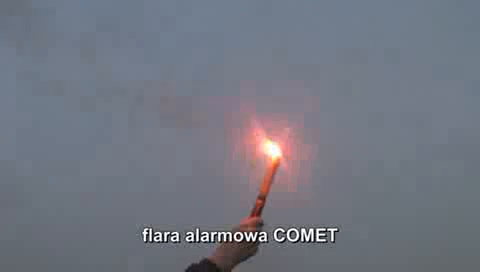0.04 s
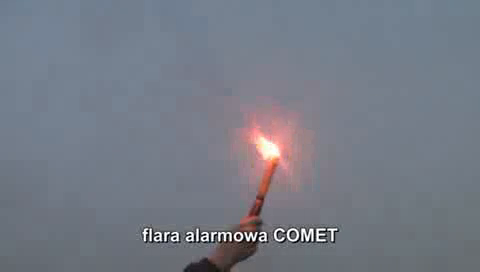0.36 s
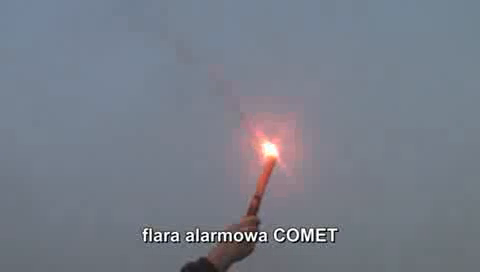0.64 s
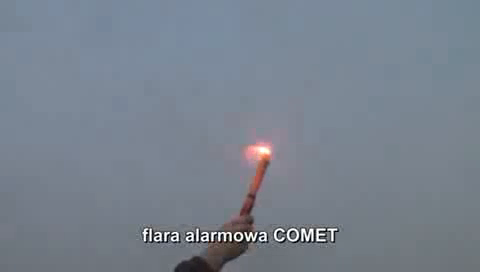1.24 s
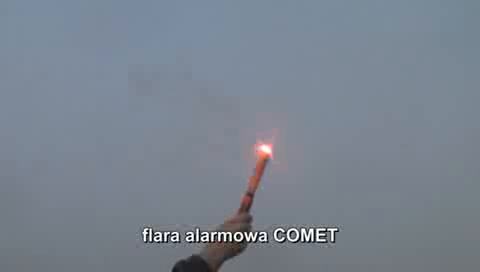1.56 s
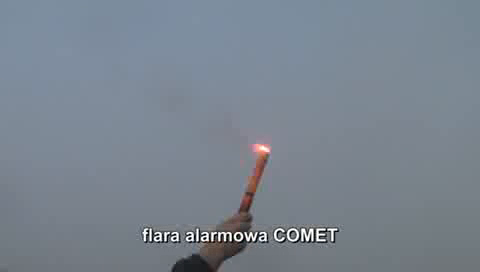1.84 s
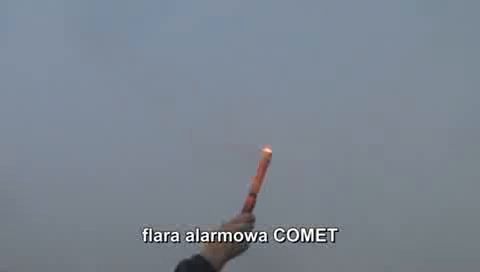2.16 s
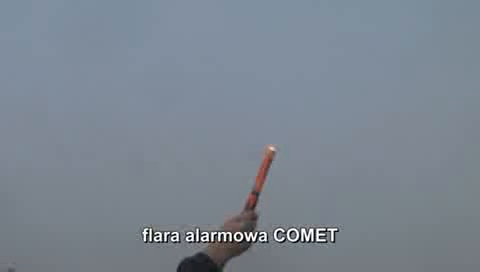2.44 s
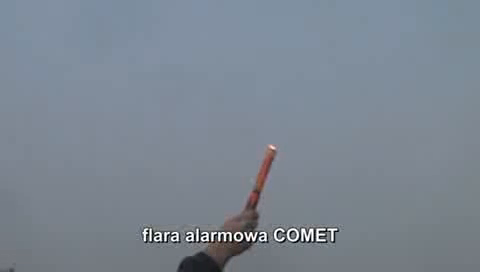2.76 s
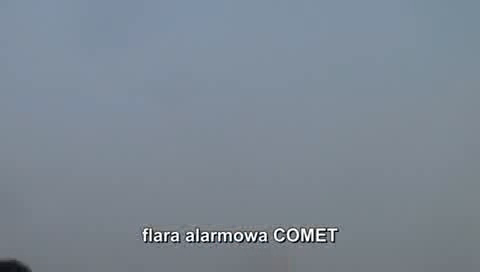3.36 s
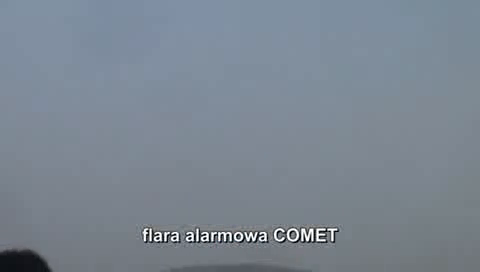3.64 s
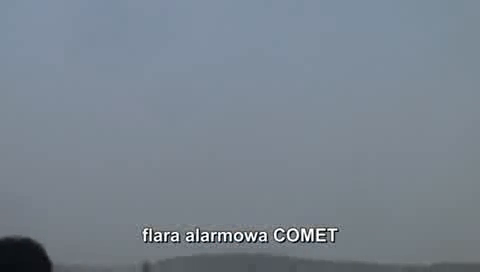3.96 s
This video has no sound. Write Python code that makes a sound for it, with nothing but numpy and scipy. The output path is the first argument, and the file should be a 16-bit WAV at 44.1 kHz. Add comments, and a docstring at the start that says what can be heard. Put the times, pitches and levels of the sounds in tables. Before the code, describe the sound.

A handheld flare burns a couple of metres away in the open air, hissing and crackling with small pops and brief breathy whistles. It thins, sputters and dies out, leaving faint distant wind and low gusts on the microphone.

```python
"""A handheld flare burns in the open air a couple of metres away, over faint distant wind.
From the start its turbulent gas jet hisses and crackles, coloured by the resonances of the tube.
Slag soon pops, and now and then the jet locks onto the lowest resonance and whistles.
As the fuel runs out the flame thins, spits and sputters, dying away before three seconds.
Last come the strongest of the gusts that buffet the microphone."""
import sys
import numpy as np
from scipy import signal
from scipy.fft import rfft, irfft
from scipy.io import wavfile

SR = 44100
rng = np.random.default_rng(int(sys.argv[2]) if len(sys.argv) > 2 else 0)


def unload_audio(sound):
    """Save the sound as a 16-bit wav file, at the path given as the first command line argument."""
    columns = np.transpose(np.atleast_2d(sound))
    # keep every value between -1 and 1, then stretch to whole-number steps
    steps = np.round(np.clip(columns, -1, 1) * 32767)
    wavfile.write(sys.argv[1], SR, steps.astype(np.int16))


N = 176400
T = np.arange(N) / SR
HZ = np.maximum(np.fft.rfftfreq(N, 1 / SR), 1)

# spectrum of the jet: (frequency [Hz], relative density [dB])
JET_SPECTRUM = [(30, -10.5), (150, -16), (290, -8.5), (400, -5.5), (490, -12.5), (650, -2.5), (830, -1.5),
                (970, -2), (1050, 4), (2000, -1.5), (2550, -0.5), (3150, -2.5), (3700, -1), (5000, -0.2),
                (7300, -2), (9500, -5), (10500, -16)]
# strength of the jet: (time [s], relative level [dB])
JET_LEVEL = [(0, -31.5), (.17, -30.5), (.25, -32.5), (.3, -31), (.44, -29), (.57, -29.5), (.66, -30.5),
             (.77, -31), (.84, -31), (.97, -32), (1.2, -32), (1.3, -34.5), (1.57, -33.5), (1.75, -34),
             (1.86, -36), (2.13, -37), (2.3, -41.5), (2.4, -47.5), (2.5, -55.5), (2.56, -60), (2.75, -69)]
# treble against the rest of the hiss: (time [s], gain [dB])
TREBLE_GAIN = [(0, 0), (.25, 1), (.6, -2), (1.0, -3), (1.22, -1.5), (1.5, -5), (2.0, -4.5), (2.25, -3.5),
               (2.38, -2.5), (2.7, -5)]
# hiss that differs between the channels: (frequency [Hz], level against the common part [dB])
HISS_SPREAD = [(100, -69), (500, -23.5), (900, -7.5), (1300, -35), (2200, -9), (3200, -13), (4300, -4.5),
               (5600, -6), (7000, -8.5), (8800, -3.5), (10000, -10)]
# stereo balance of the flare: (frequency [Hz], left minus right [dB])
FLARE_BALANCE = [(300, 2), (850, -2), (1300, -0.5), (2300, 0), (3100, 0), (4100, 2), (6000, -0.5),
                 (10000, 0.5)]
# resonances of the tube: (nominal frequency [Hz], bandwidth [Hz], lift [dB])
TUBE_MODES = [(1262, 79, 5.5), (1458, 330, 4.5), (4060, 640, 6), (7520, 600, 2)]
# their shift as the tube burns down: (time [s], frequency shift [%])
TUBE_SHIFT = [(0, -8), (.3, -1), (1.05, 0.5), (1.45, 3.5), (2.1, 4), (2.4, 0)]
# reflections off nearby surfaces: (left delay [s], right delay [s])
REFLECTION_DELAYS = [(.00466, .00467), (.00740, .00746), (.00753, .00761), (.00786, .00792)]
# their amplitudes, negative if inverted: (left gain [ratio], right gain [ratio])
REFLECTION_GAINS = [(0.27, 0.14), (0.61, 0.038), (-0.11, -0.017), (0.21, 0.15)]
# spectrum of the distant wind: (frequency [Hz], relative density [dB])
WIND_SPECTRUM = [(25, -1.5), (55, -26), (100, -0.5), (170, -10.5), (280, -3.5), (450, -4.5), (800, -2),
                 (1600, -6.5), (3000, -12), (6000, -18.5), (9000, -22), (10500, -43)]
# likeness of its two channels: (frequency [Hz], coherence [ratio])
WIND_COHERENCE = [(60, 1), (600, 0.19), (1200, 0.24), (4000, .3), (9000, .12)]
# lag of its right channel: (frequency [Hz], phase [rad])
WIND_LAG = [(600, 0.14), (1000, 2.5), (8500, 2.3)]
# its strength: (time [s], level [dB])
WIND_LEVEL = [(0, -45.5), (1.3, -50.5), (2.0, -49.5), (2.6, -50), (3.2, -49), (3.6, -49.5), (4, -51.5)]
# light breeze on the microphone: (time [s], relative level [dB])
BREEZE_LEVEL = [(0, -45), (.7, -78), (1.1, -61), (1.5, -89), (2.0, -69), (2.7, -60.5), (3.6, -66.5),
                (4, -60)]
# gusts: (time [s], half length [s], relative rumble level [dB], relative flutter level [dB])
GUST_SWELLS = [(0.09, 0.05, -42.5, -49.5), (0.135, 0.061, -50, -55), (0.3, 0.029, -62, -53),
               (2.14, 0.021, -57, -67), (2.57, 0.13, -60, -54.5), (2.878, 0.026, -50, -39.5),
               (2.958, 0.057, -43, -45), (3.075, 0.054, -41, -43), (3.183, 0.088, -41.5, -45),
               (3.884, 0.066, -51, -78), (3.946, 0.021, -56, -53)]
# slow rumble of the gusts: (frequency [Hz], relative density [dB])
RUMBLE_SPECTRUM = [(12, 0), (33, 21), (55, 8), (110, -57)]
# their faster flutter: (frequency [Hz], relative density [dB])
FLUTTER_SPECTRUM = [(30, -3.5), (60, -7.5), (95, 3), (185, -9), (260, -14), (500, -52), (2000, -73)]
# slag pops: (time [s], relative peak level [dB], low-pass corner [Hz])
SLAG_POPS = [(0.1118, -27, 5000), (0.1903, -17, 5000), (0.2206, -20, 5000), (0.2240, -21, 4000),
             (0.3747, -19.5, 4000), (.996, -11, 3500), (1.015, -17.5, 6000), (1.0472, -19, 2500),
             (1.077, -20, 4500), (1.303, -22, 4500), (1.639, -24, 4500), (1.771, -19.5, 5000),
             (2.052, -25, 6000), (2.088, -24, 4000), (2.0955, -18.5, 3480), (2.159, -42, 2500),
             (2.4335, -27.5, 3000), (2.592, -35, 6000), (2.653, -43, 7000)]
# flare-ups of the flame: (time [s], rise [dB], half length [s])
FLAME_SPUTTERS = [(0.225, 4.5, 0.0081), (1.052, 1.5, 0.012), (1.204, 3, 0.029), (1.408, 3, 0.011),
                  (1.51, 3.5, 0.02), (1.66, 2.5, 0.015), (1.787, 5, 0.0074), (1.902, 6.5, 0.0055),
                  (1.917, 4, 0.004), (2.095, 4.5, 0.015), (2.168, 8.5, 0.0071), (2.247, 4.5, .009),
                  (2.283, 2, 0.0088), (2.321, 6.5, 0.012), (2.363, 8, 0.008), (2.415, 6, 0.0037),
                  (2.429, 7.5, 0.006), (2.496, 7.5, 0.014), (2.59, 13, .005), (2.661, 12, 0.011)]
# whistles of the tube: (time [s], half length [s], level [dB])
TUBE_WHISTLES = [(0.292, 0.026, -36), (0.592, .045, -40.5), (0.847, 0.032, -36.5), (1.057, 0.05, -40.5),
                 (2.32, .08, -50.5)]


def from_db(db):
    """Amplitude grows tenfold with every 20 dB."""
    return 10 ** (np.asarray(db) / 20)


def rms_one(x):
    """Normalisation to unit mean power."""
    return x / np.sqrt(np.mean(x ** 2) + 1e-20)


def in_time(rows):
    """Linear interpolation of (time [s], value) at every sample."""
    return np.interp(T, *np.transpose(rows))


def per_hz(rows):
    """Interpolation of (frequency [Hz], value) on a logarithmic frequency axis."""
    hz, value = np.transpose(rows)
    return np.interp(np.log(HZ), np.log(hz), value)


def swell(centre_s, half_s):
    """A Gaussian envelope, down to 1/e at half_s from its centre."""
    return np.exp(-((T - centre_s) / half_s) ** 2)


def drift(corner_hz):
    """Low-passed noise gives a random fluctuation of unit rms."""
    return rms_one(irfft(rfft(rng.standard_normal(N)) / (1 + (HZ / corner_hz) ** 2), N))


def reshape(spectrum, band, db):
    """Amplitude modulation of one band of a spectrum."""
    return spectrum + rfft(irfft(spectrum * band, N) * (from_db(db) - 1))


def stereo_noise(spectrum, coherence, lag=0, pan_db=0):
    """Partial coherence: two channels are the sum and difference of independent noises."""
    mid, side = rfft(rng.standard_normal((2, N)))
    pair = np.sqrt(1 + coherence) * mid + np.sqrt(1 - coherence) * side * [[1], [-1]]
    pair[1] *= np.exp(-1j * lag) * from_db(-pan_db)
    return rms_one(irfft(pair * from_db(per_hz(spectrum)), N))


def jet_colour():
    """Causality: the jet's spectrum as a minimum-phase filter, so nothing rings before its cause."""
    gain = rms_one(from_db(per_hz(JET_SPECTRUM)))
    cepstrum = irfft(np.log(gain), N)
    causal_window = np.r_[1, np.full(N // 2 - 1, 2), np.zeros(N - N // 2)]
    return np.exp(rfft(cepstrum * causal_window))


def jet_strength(decay_db_per_s=53, attack_s=.006):
    """Amplitude modulation: the jet fades, and flutters more deeply, as the fuel runs out."""
    burn_db = in_time(JET_LEVEL) - 3 - decay_db_per_s * np.maximum(T - JET_LEVEL[-1][0], 0)
    flutter_db = .68 * np.interp(T, (1.5, 2), (1, 1.9)) * drift(corner_hz=28)
    roughness_db = 1.26 * drift(corner_hz=380)
    onset = np.minimum(T / attack_s, 1) ** 2
    return from_db(burn_db + flutter_db + roughness_db + sputter_db()) * onset


def crackle(per_s, spread_db=4):
    """Shot noise: burning grains give impulses at random times, mostly weak, a few strong."""
    sizes = from_db(spread_db * np.minimum(rng.exponential(1, N), 4.5))
    return rms_one(sizes * rng.choice([-1, 1], N) * (rng.random(N) < per_s / SR))


def jet_hiss(colour, treble_hz=2570, body_hz=(550, 1120)):
    """Turbulence radiates broadband noise; hiss, crackle and spitting all follow the jet's strength."""
    strength = jet_strength()
    common, side = rng.standard_normal((2, N))
    common = rms_one(common + from_db(-7.5) * crackle(per_s=2500)) + spitting()
    difference = rfft(side * strength) * from_db(per_hz(HISS_SPREAD)) * [[1], [-1]]
    hiss = colour * (rfft(common * strength) + difference)
    treble = 1 / (1 + (treble_hz / HZ) ** 4)
    hiss = reshape(hiss, treble, in_time(TREBLE_GAIN) - .18 * sputter_db())  # sputters lift it less
    body = 1 / (1 + (body_hz[0] / HZ) ** 10) / (1 + (HZ / body_hz[1]) ** 20)
    thinning_db = np.interp(T, (.79, 2.4), (0, -3.5))  # the shrinking flame loses body
    return irfft(reshape(hiss, body, thinning_db), N)


def tube(x):
    """Resonance: the tube lifts a few bands, which climb as it burns down and sag at the end."""
    phase_per_hz = 2 * np.pi * np.cumsum(1 + in_time(TUBE_SHIFT) / 100) / SR
    for hz, width_hz, lift_db in TUBE_MODES:
        carrier = np.exp(1j * hz * phase_per_hz)
        pole = np.exp(-np.pi * width_hz / SR)
        ringing = np.real(carrier * signal.lfilter([1 - pole], [1, -pole], x / carrier))
        x = x + 2 * (from_db(lift_db) - 1) * ringing
    return x


def echoes(low_hz=800, high_hz=5200):
    """Interference: band-limited reflections add to the direct sound and form a comb filter."""
    band = 1 / np.sqrt((1 + (low_hz / HZ) ** 2) * (1 + (HZ / high_hz) ** 8))
    delays = np.exp(-2j * np.pi * HZ * np.array(REFLECTION_DELAYS)[..., None])
    paths = np.array(REFLECTION_GAINS)[..., None] * delays
    return 1 + band * paths.sum(axis=0)


def flare():
    """Source and filter: hiss and pops excite the tube, the whistle joins, and all are reflected."""
    colour = jet_colour()
    source = tube(jet_hiss(colour) + slag_pops(colour)) + whistle()
    balance = from_db(per_hz(FLARE_BALANCE) * [[.5], [-.5]])
    return irfft(rfft(source) * echoes() * balance, N)


def distant_wind():
    """Flow noise from afar: a smooth rush, coherent between the channels mainly in the bass."""
    rush = stereo_noise(WIND_SPECTRUM, per_hz(WIND_COHERENCE), per_hz(WIND_LAG), pan_db=-.8)
    return from_db(in_time(WIND_LEVEL)) * rush


def buffeting():
    """Pressure fluctuations at the microphone: breeze and gusts add in power, rumbling and fluttering."""
    rumble_gain = flutter_gain = from_db(in_time(BREEZE_LEVEL))
    for time_s, half_s, rumble_db, flutter_db in GUST_SWELLS:
        gust = swell(time_s, half_s)
        rumble_gain = np.hypot(rumble_gain, from_db(rumble_db) * gust)
        flutter_gain = np.hypot(flutter_gain, from_db(flutter_db) * gust)
    rumble = from_db(-.5) * stereo_noise(RUMBLE_SPECTRUM, coherence=.5, pan_db=-2)
    unevenness = from_db(.5 + drift(corner_hz=39))
    flutter = unevenness * stereo_noise(FLUTTER_SPECTRUM, coherence=.5)
    return rumble_gain * rumble + flutter_gain * flutter


def slag_pops(colour, samples=400, boost_db=3):
    """Impulse response: each pop is one pressure pulse in the colour of the jet, dulled by a low-pass."""
    out = np.zeros(N)
    response = irfft(colour, N)[:samples]
    for time_s, db, corner_hz in SLAG_POPS:
        pulse = signal.lfilter([1], [1, -np.exp(-2 * np.pi * corner_hz / SR)], response)
        start = int(time_s * SR)
        out[start:start + samples] += from_db(db + boost_db) * pulse / np.abs(pulse).max()
    return out


def sputter_db():
    """Transient modulation: each flare-up of the flame briefly raises the jet's level."""
    return sum(rise_db * swell(time_s, half_s) for time_s, rise_db, half_s in FLAME_SPUTTERS)


def whistle(centre_hz=1254, width_hz=55):
    """Lock-in: near the tube's lowest resonance the jet briefly gives a breathy, narrow-band tone."""
    band = 1 / (1 + (2 * (HZ - centre_hz) / width_hz) ** 2)
    tone = rms_one(irfft(rfft(rng.standard_normal(N)) * band, N))
    tone = rms_one(tone / np.hypot(np.abs(signal.hilbert(tone)), 1))  # soft limiting steadies it
    return tone * sum(from_db(db) * swell(time_s, half_s) for time_s, half_s, db in TUBE_WHISTLES)


def bass_dip(x, corner_hz=340, depth_db=-2):
    """Shelving attenuation: the bass dips briefly."""
    bass = 1 / (1 + (HZ / corner_hz) ** 4)
    return irfft(reshape(rfft(x), bass, depth_db * swell(centre_s=1.17, half_s=.05)), N)


def spitting(corner_hz=4500, rise_s=(1.27, 2.8)):
    """Sparser, duller shot noise: the share of coarse spits grows as the jet weakens."""
    spits = rms_one(irfft(rfft(crackle(per_s=300)) / (1 + 1j * HZ / corner_hz), N))
    return from_db(-6) * np.interp(T, rise_s, (0, 1)) * spits


def scene():
    """Superposition: the pressures of flare, distant wind and gusts add."""
    return bass_dip(flare() + distant_wind() + buffeting())


def record(dry, cutoff_hz=10500):
    """Band limiting: an elliptic low-pass cuts the top steeply."""
    return signal.sosfilt(signal.ellip(12, .2, 70, cutoff_hz, fs=SR, output="sos"), dry)


dry = scene()
out = record(dry)
unload_audio(out)
```